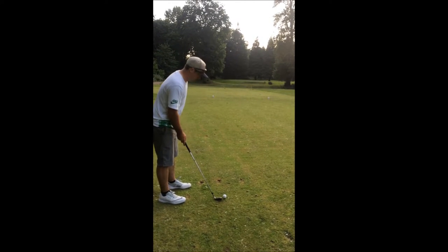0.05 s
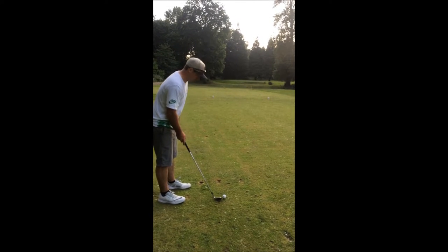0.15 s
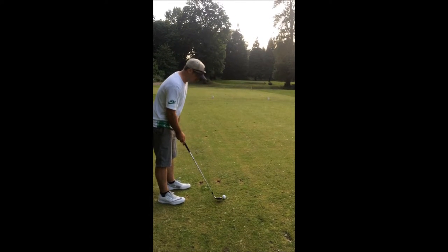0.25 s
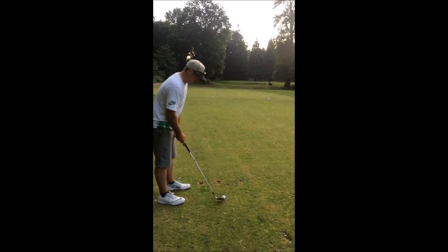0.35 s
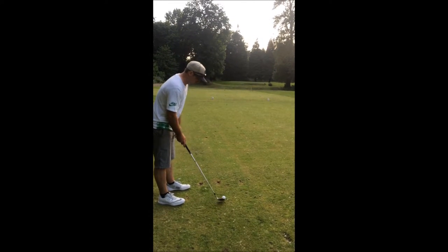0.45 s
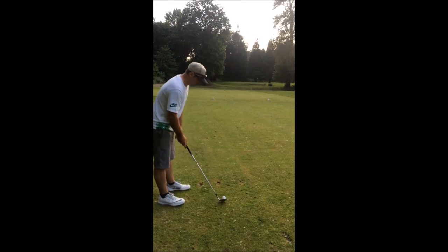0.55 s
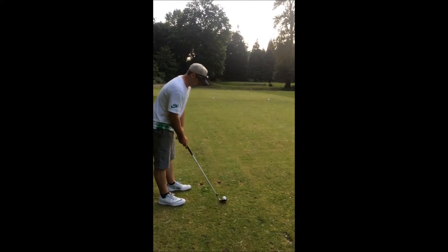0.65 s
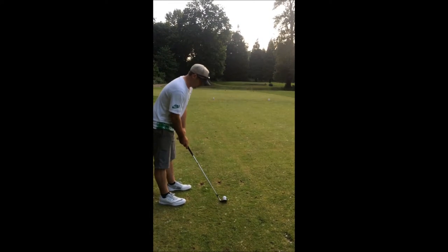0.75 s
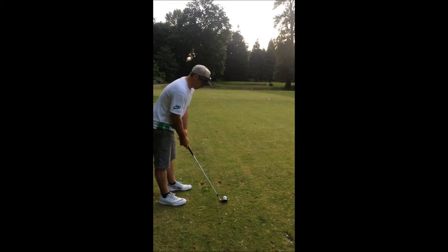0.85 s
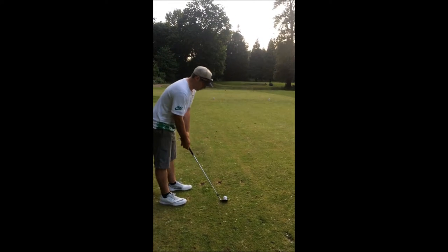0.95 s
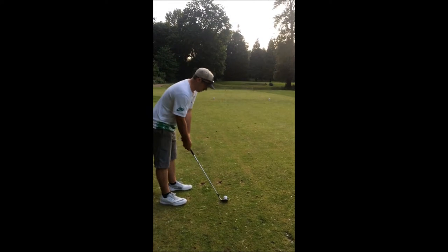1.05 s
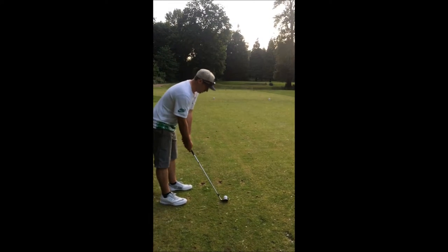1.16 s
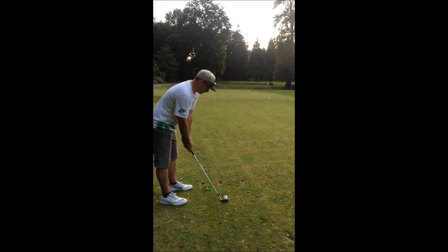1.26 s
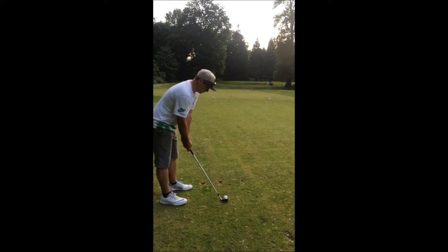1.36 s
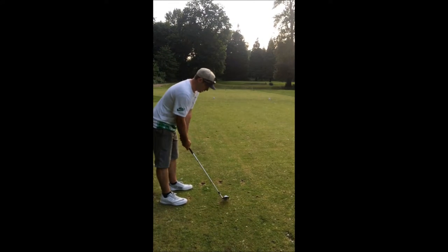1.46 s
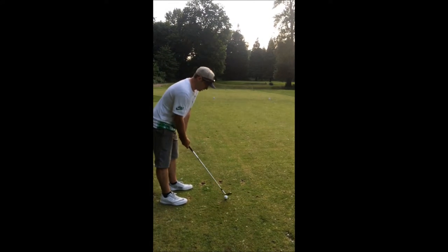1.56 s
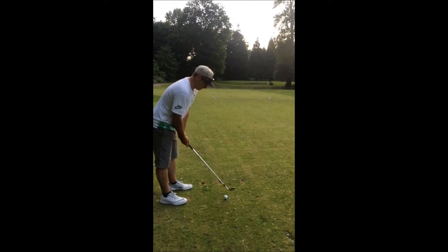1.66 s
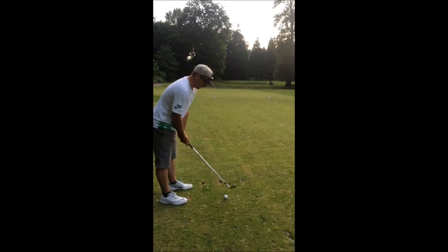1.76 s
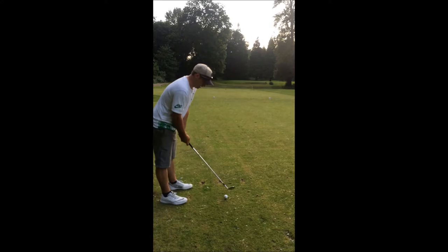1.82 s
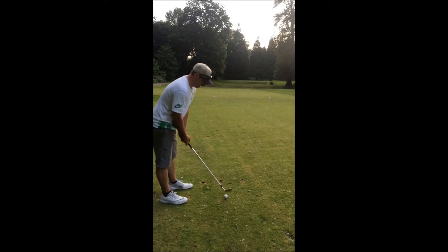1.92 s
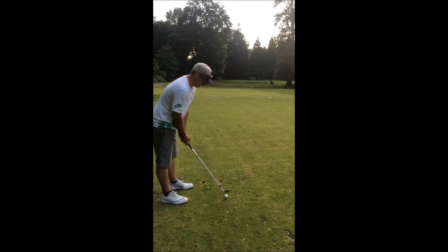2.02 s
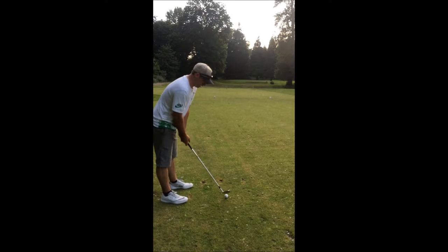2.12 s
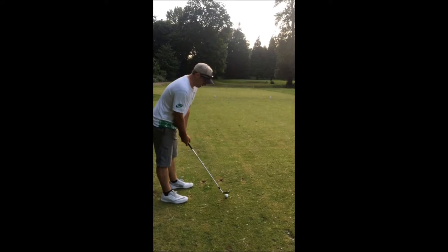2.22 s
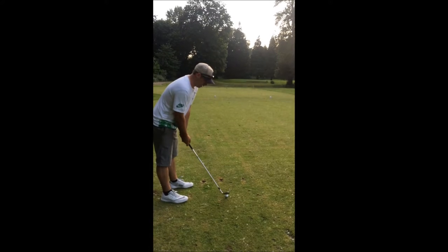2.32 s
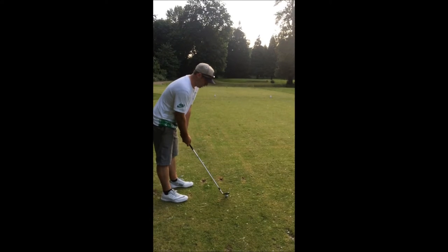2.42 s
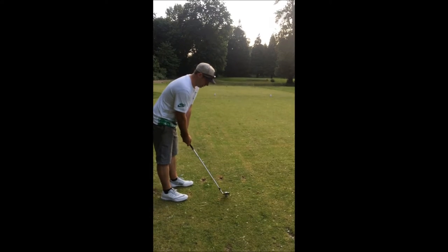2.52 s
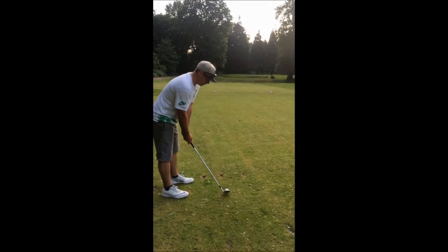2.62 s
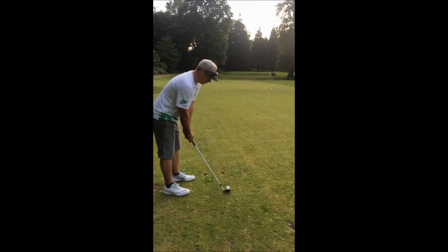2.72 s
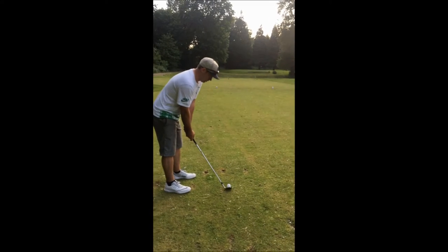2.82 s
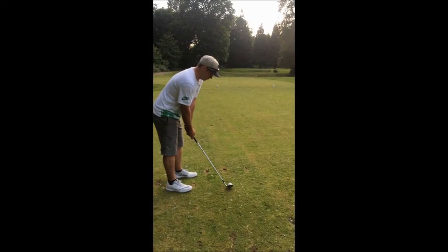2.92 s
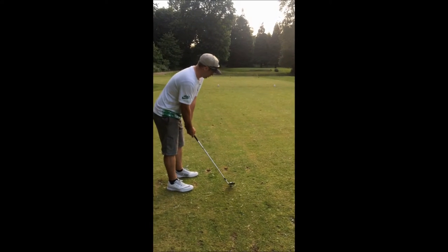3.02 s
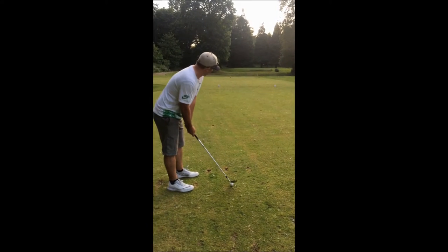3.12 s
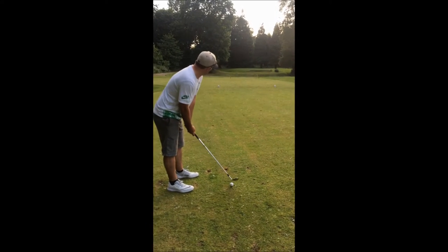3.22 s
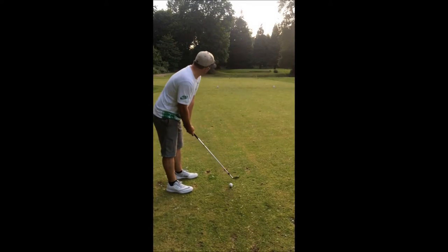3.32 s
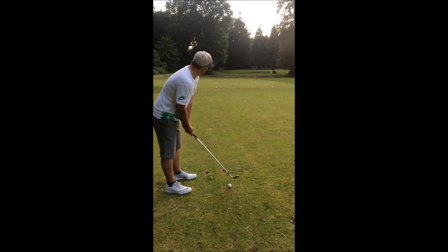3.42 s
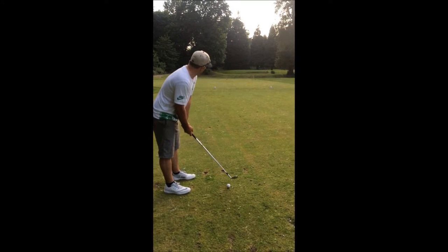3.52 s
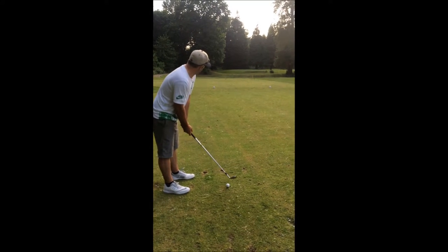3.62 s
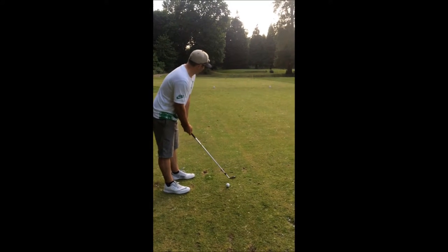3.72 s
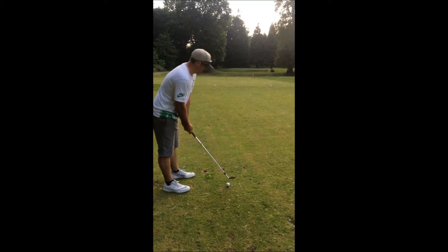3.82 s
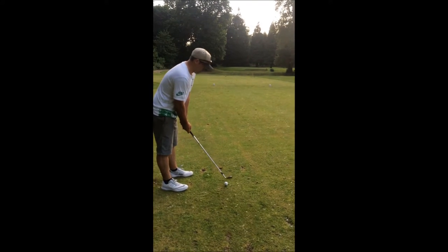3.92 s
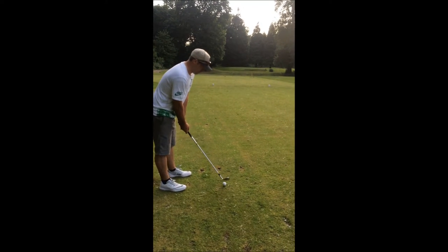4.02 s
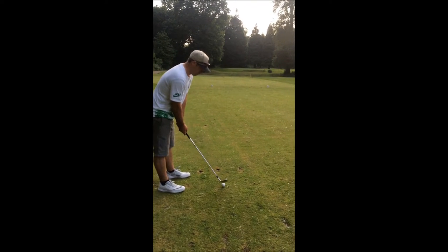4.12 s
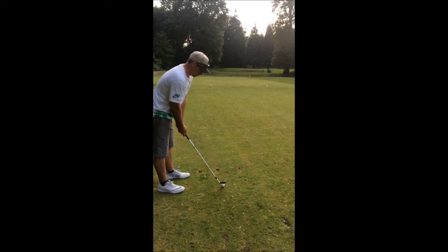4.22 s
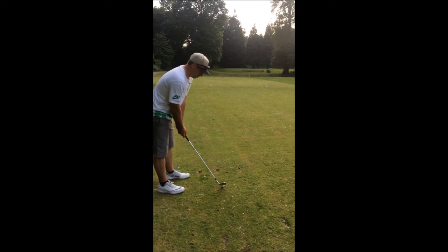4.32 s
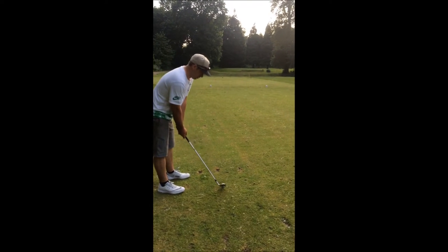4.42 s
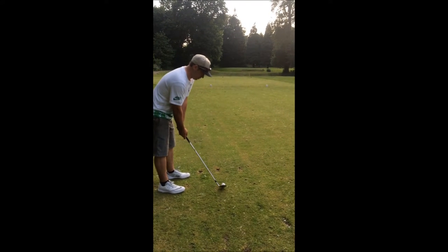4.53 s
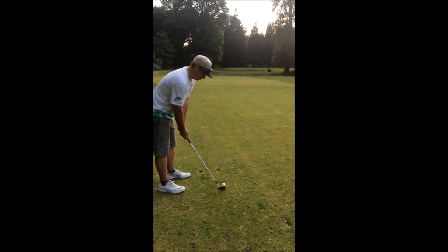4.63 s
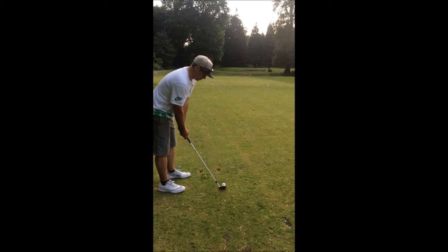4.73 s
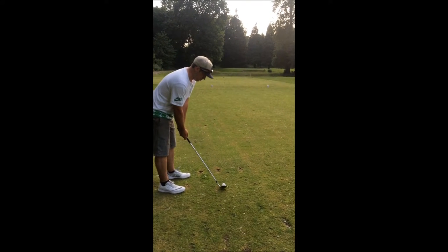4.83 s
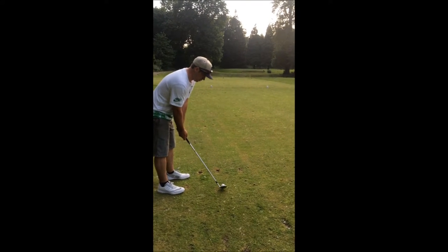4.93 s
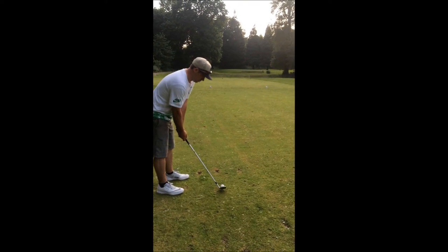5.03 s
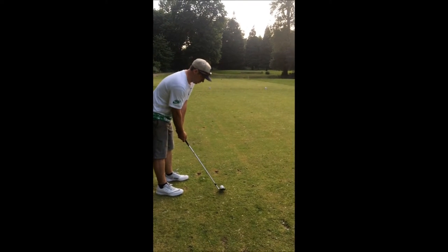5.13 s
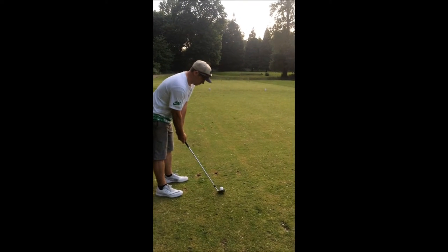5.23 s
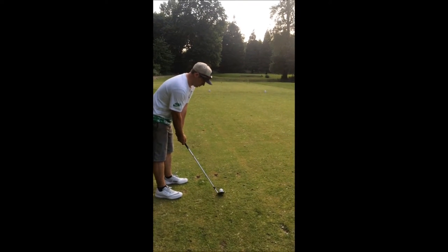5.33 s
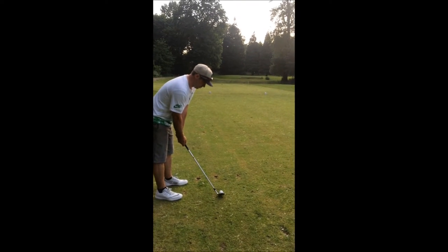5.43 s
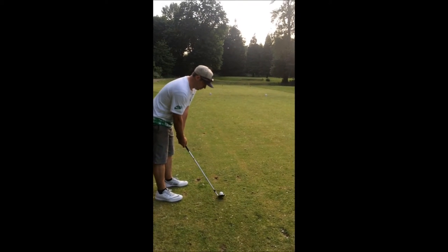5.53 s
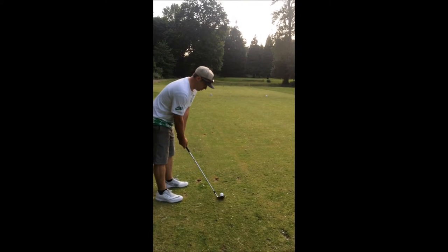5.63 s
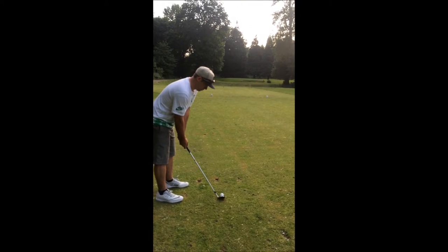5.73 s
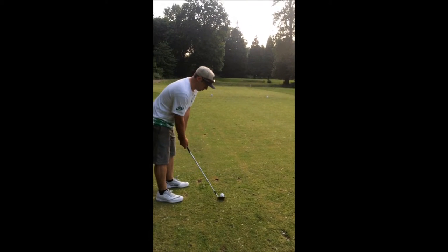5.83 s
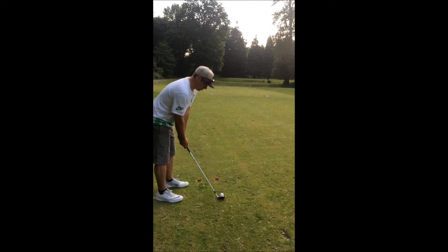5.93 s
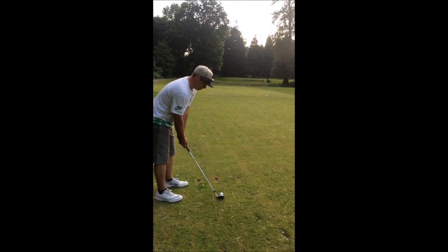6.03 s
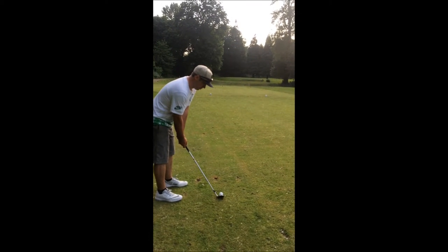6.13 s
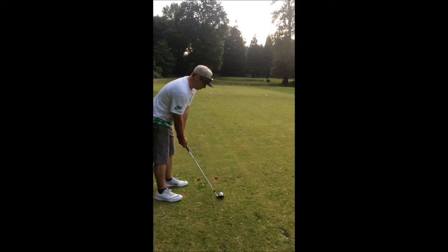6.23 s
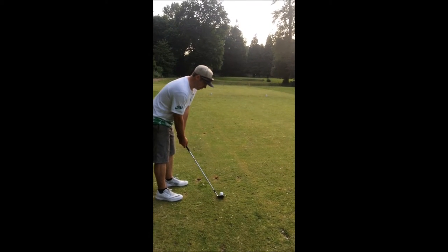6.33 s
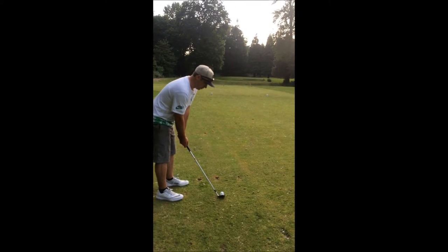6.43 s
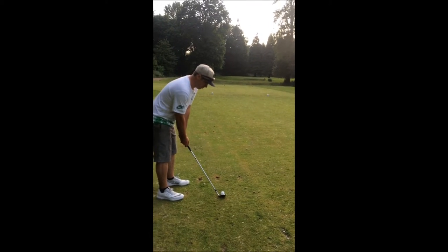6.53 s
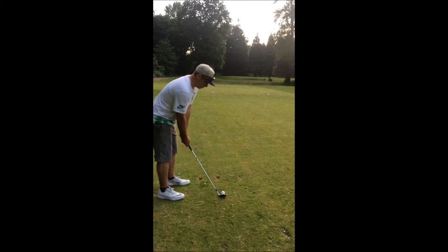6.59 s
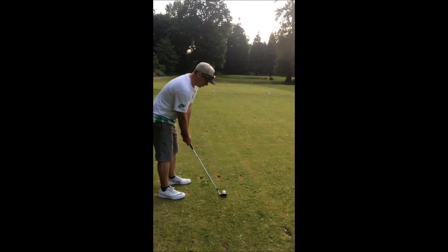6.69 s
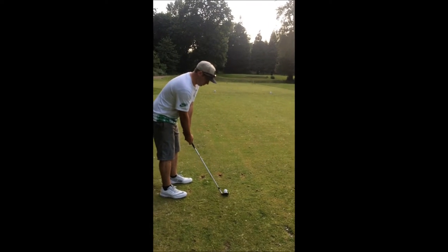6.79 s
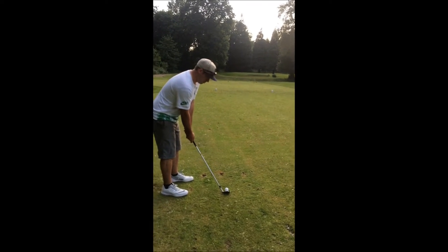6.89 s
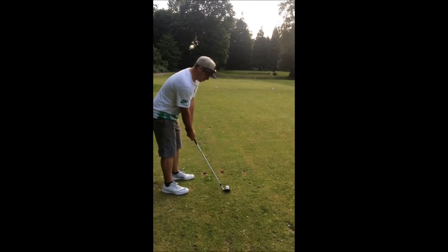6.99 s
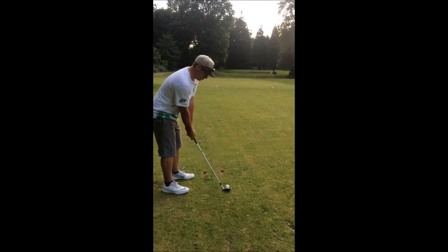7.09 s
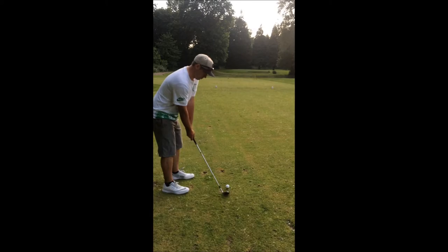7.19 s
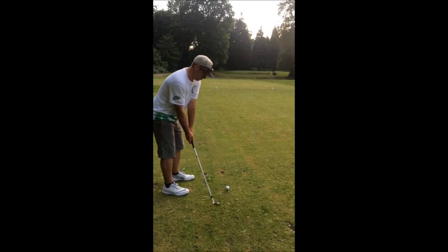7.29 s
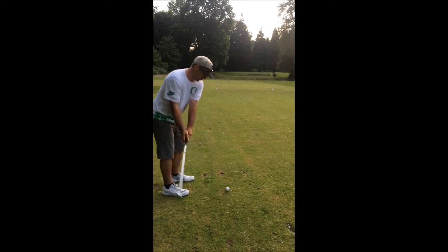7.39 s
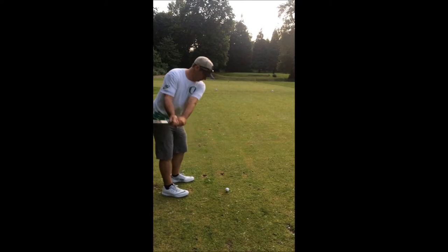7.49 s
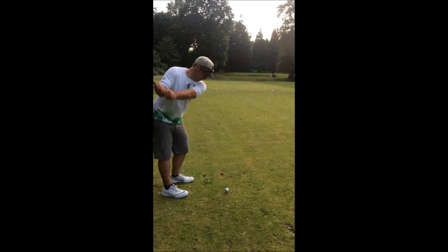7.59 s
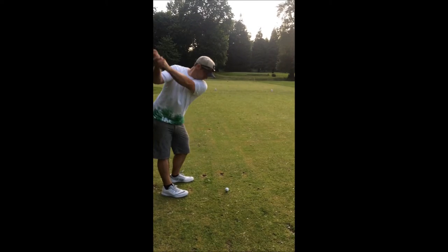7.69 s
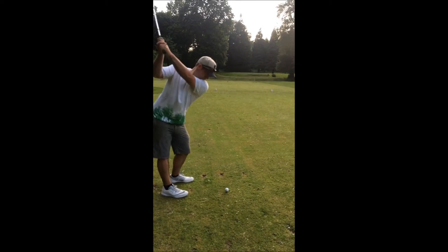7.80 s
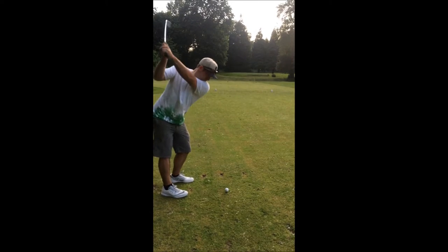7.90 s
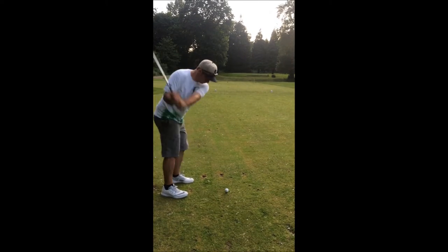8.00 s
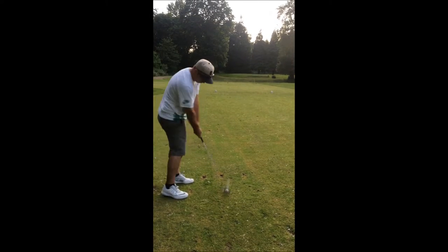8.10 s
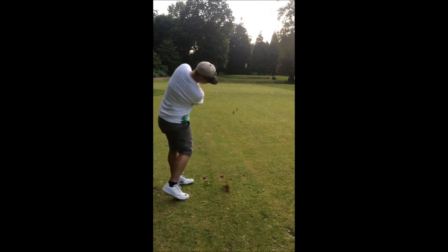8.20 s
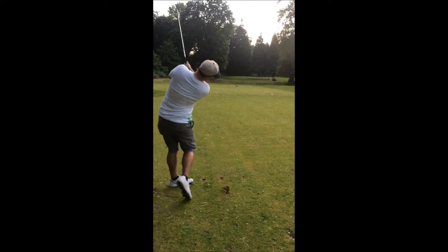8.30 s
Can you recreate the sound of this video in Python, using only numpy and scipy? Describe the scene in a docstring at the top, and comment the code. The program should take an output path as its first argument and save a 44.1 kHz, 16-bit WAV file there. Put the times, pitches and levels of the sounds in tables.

```python
"""Distant traffic rumbles, a far mower hums and small birds call from the echoing wood round a fairway.
Grass and cloth rustle as a golfer addresses the ball. Near the end an iron swings down: the shaft
whistles as it sheds vortices, the face cracks on the ball, ball and head ring, the blade tears the
turf, crumbs of soil scatter and the trees return the crack."""
import sys
import numpy as np
from scipy import signal
from scipy.fft import rfft, irfft, next_fast_len
from scipy.io import wavfile
from scipy.ndimage import uniform_filter1d

SR = 44100
rng = np.random.default_rng(int(sys.argv[2]) if len(sys.argv) > 2 else 0)


def dump(signal):
    """Clip the signal to [-1, 1] and save it as 16-bit WAV at the path in sys.argv[1]."""
    limited = np.clip(np.atleast_2d(signal).T, -1, 1)
    pcm = np.round(limited * 32767).astype(np.int16)
    wavfile.write(sys.argv[1], SR, pcm)


N = 368250
TIME = np.arange(N) / SR
HIT_S, TURF_S = 8.20135, 8.2072  # club meets ball, then ground


def undb(db):
    """Decibels to gain."""
    return 10 ** (np.asarray(db) / 20)


def unit(x):
    """Scale to rms 1."""
    return x / np.sqrt(np.mean(x ** 2))


def response(points, size):
    """Gain of a (frequency [Hz], level [dB]) spectrum on FFT bins."""
    hz, db = np.transpose(points)
    return undb(np.interp(np.log(np.fft.rfftfreq(size, 1 / SR) + 1), np.log(hz), db))


def colour(x, points):
    """Filter by a spectrum, to rms 1."""
    size = next_fast_len(N, True)
    return unit(irfft(rfft(x, size) * response(points, size), size)[:N])


def noise(points):
    """Coloured noise, rms 1."""
    return colour(rng.standard_normal(N), points)


def grains(per_s, spread_db):
    """Random snaps of uneven size."""
    snaps = (rng.random(N) < per_s / SR) * rng.choice([-1, 1], N)
    return snaps * undb(spread_db * np.minimum(rng.exponential(size=N), 4))


def walk(rate_hz):
    """Smooth random drift, rms 1."""
    k = int(SR / rate_hz)
    steps = np.repeat(rng.standard_normal(N // k + 2), k)
    smooth = uniform_filter1d(uniform_filter1d(steps, k), k)
    return unit(smooth[k // 2:k // 2 + N])


def swells(rows):
    """Gain of bell curves (time [s], half-width [s], level [dB]); powers add."""
    return np.sqrt(sum(undb(db) ** 2 * np.exp(-((TIME - s) / width) ** 2) for s, width, db in rows))


def decay(t, t60_s):
    """Gain falling 60 dB in t60_s."""
    return np.exp(-np.log(1000) * t / t60_s)


def fade(start_s, hold_s, t60_s):
    """Gain that opens at once, holds, then decays."""
    return (TIME >= start_s) * decay(np.maximum(TIME - start_s - hold_s, 0), t60_s)


def ring(t, hz, t60_s):
    """One decaying mode."""
    return np.sin(2 * np.pi * hz * t) * decay(t, t60_s)


def add(out, s, sound):
    """Mix a short sound in at time s."""
    i = int(np.clip(s * SR, 0, N - 1))
    out[i:i + len(sound)] += sound[:N - i]


def traffic(rumble_db=-40.5, roar_db=-52.5):
    """Far traffic rumbles and its tyres roar; one car passes."""
    # rumble spectrum before the low-pass (frequency [Hz], level [dB])
    rumble_spectrum = [(20, -26), (30, -21.5), (45, -5), (68, 2), (100, -5), (150, -4), (200, -10),
                       (270, -18), (360, -30), (600, -39)]
    # tyre and air spectrum (frequency [Hz], level [dB])
    roar_spectrum = [(150, -13.5), (400, 1.5), (570, 0.5), (780, 3), (1000, 1.5), (1300, -2.5),
                     (1700, -9.5), (2300, -16.5), (3200, -24.5), (4500, -31), (8000, -34), (15000, -36.5)]
    # passing car (time [s], half-width [s], level [dB])
    far_car = [(.8, 0.7, -58)]
    bass = signal.sosfilt(signal.butter(2, 600, fs=SR, output="sos"), noise(rumble_spectrum))
    rumble = bass * undb(rumble_db + 1.03 * walk(11))
    roar = noise(roar_spectrum) * np.hypot(undb(roar_db), swells(far_car)) * undb(.27 * walk(7))
    return rumble + roar


def tone(hz, db, wander_hz):
    """A far tone wavering in moving air."""
    gain = undb(db + 2 * walk(4))
    pitch_hz = hz + wander_hz * walk(7)
    return gain * np.sin(2 * np.pi * np.cumsum(pitch_hz) / SR)


def mower(blade_hz=162, blade_db=-66):
    """A far engine drones; blade harmonics come and go with the air."""
    # engine tones (frequency [Hz], level [dB], wander [Hz])
    hum = [(74.2, -44.5, 2.54), (136, -45, 0.82), (164.7, -51, 1.53), (333, -70.5, 0.67)]
    # blade tones carried over (time [s], half-width [s], harmonic [number], level [dB])
    blade_swells = [(.05, 0.13, 3, -62), (1.1, 0.63, 6, -62.5), (1.55, .3, 3, -63.5), (4.35, 0.39, 3, -58),
                    (7.22, 0.16, 4, -55.5), (7.65, 0.55, 3, -57.5)]
    engine = sum(tone(hz, db, wander_hz) for hz, db, wander_hz in hum)
    blade = tone(3 * blade_hz, blade_db, wander_hz=1)
    for s, width_s, harmonic, db in blade_swells:
        blade += swells([(s, width_s, db)]) * tone(harmonic * blade_hz, 0, wander_hz=1)
    return engine + blade


def note(length_s, start_hz, middle_hz, end_hz, depth_hz, trill_hz=45):
    """A whistle bent through three pitches with an uneven trill, rms 1."""
    u = np.linspace(0, 1, max(int(length_s * SR), 64))
    t = u * length_s
    arch_hz = np.polyval(np.polyfit([0, .5, 1], [start_hz, middle_hz, end_hz], 2), u)
    jitter = np.interp(t, np.arange(N // 100) / 200, rng.standard_normal(N // 100))
    pitch_hz = arch_hz + depth_hz * (np.sin(2 * np.pi * trill_hz * t) + .5 * jitter)
    return unit(np.sin(2 * np.pi * np.cumsum(pitch_hz) / SR) * signal.windows.tukey(len(u), .3))


def wood(song, t60_s, direct_db, echo_db):
    """Direct sound plus a tail scattered by the trunks."""
    tail = rng.standard_normal(SR) * decay(TIME[:SR], t60_s)
    echo = signal.fftconvolve(song, tail / np.linalg.norm(tail))[:N]
    return undb(direct_db) * song + undb(echo_db) * echo


def far_birds(seep_hz=(6580, 6770, 6760), seep_s=.083, buzz_share=.045, flutter_db=1.5):
    """Whistles, buzzes and thin calls flutter in the air, smeared by the wood."""
    # flat whistles (time [s], length [s], pitch [Hz], source level [dB], trill depth [Hz])
    whistles = [(0, .07, 4225, -70, 19), (.08, .22, 4270, -73.5, 35), (.345, 0.2, 3690, -65.5, 55),
                (.6, 0.085, 3070, -74, 40), (.679, .2, 3650, -65.5, 28), (3.29, 0.15, 2478, -70, 10),
                (5.28, .3, 3530, -78, 36), (5.81, .2, 4180, -78, 17), (6.43, .45, 3830, -83, 70)]
    # buzzy trills (time [s], length [s], pitch [Hz], source level [dB])
    buzzes = [(1.97, .2, 4560, -74), (2.096, 0.16, 5300, -72.5), (2.259, .22, 5650, -78),
              (3.55, .24, 4430, -74), (3.8, 0.45, 3950, -78), (3.87, 1.07, 4740, -76.5),
              (5.07, 0.19, 3400, -68), (5.64, .39, 4630, -78.5)]
    # thin calls that rise and level off (time [s], source level [dB])
    seeps = [(1.05, -79), (2.87, -73), (4.4, -76), (5.56, -75), (7.26, -74)]
    song = np.zeros(N)
    for s, length_s, hz, db, depth_hz in whistles:
        add(song, s, undb(db) * note(length_s, hz, hz, hz, depth_hz))
    for s, length_s, hz, db in buzzes:
        add(song, s, undb(db) * note(length_s, hz, hz, hz, depth_hz=buzz_share * hz))
    for s, db in seeps:
        add(song, s, undb(db) * note(seep_s, *seep_hz, depth_hz=70))
    return wood(song * undb(flutter_db * walk(40)), t60_s=.73, direct_db=-6, echo_db=-4)


def chorus(murmur_db=-83, flicker_db=1.8):
    """The farthest birds merge into a flickering blur."""
    # waves of song (time [s], half-width [s], level [dB])
    waves = [(2.6, 0.66, -75), (4.15, 0.47, -74.5)]
    # song spectrum (frequency [Hz], level [dB])
    spectrum = [(2500, -29), (3500, -2), (4400, 0.5), (5400, -3.5), (6500, -5), (7800, -11.5), (10000, -33)]
    return np.hypot(undb(murmur_db), swells(waves)) * noise(spectrum) * undb(flicker_db * walk(30.05))


def near_birds(whip_cycles=205, pip_hz=3492, pip_s=.045, chirp_hz=(3480, 3840, 3760), upper_ratio=1.178):
    """Crisp whips, pips and two-voiced chirps from the nearest trees."""
    # falling whips (time [s], start pitch [Hz], source level before the taper [dB])
    whips = [(3.1, 4370, -70), (3.218, 4430, -72), (4.255, 4200, -75), (4.97, 7300, -70.5),
             (5.245, 4430, -71), (5.385, 4350, -72), (6.02, 4330, -70), (6.287, 7300, -70),
             (6.93, 3700, -72), (7.032, 4300, -70), (7.178, 4250, -68.5), (8.075, 4400, -71)]
    # one-pitch pips (time [s], source level [dB])
    pips = [(7.06, -75), (7.475, -68.5), (7.758, -68.5), (7.99, -68)]
    # arched chirps (time [s], source level of the lower voice [dB])
    chirps = [(.365, -71.5), (1.075, -69.5), (2.535, -70.5), (4.07, -72), (5.18, -69.5), (5.475, -69),
              (6.759, -71.5)]
    song = np.zeros(N)
    for s, hz, db in whips:
        whip = note(whip_cycles / hz, hz, .82 * hz, .55 * hz, depth_hz=70)
        add(song, s, undb(db) * whip * np.hanning(len(whip)) ** .5)
    for s, db in pips:
        add(song, s, undb(db) * note(pip_s, pip_hz, pip_hz, pip_hz, depth_hz=12))
    for s, db in chirps:  # both sides of the syrinx sing at once
        length_s = .05 + .0036 * rng.standard_normal()
        arch_hz = np.array(chirp_hz) * (1 + .0062 * rng.standard_normal())
        lower = note(length_s, *arch_hz, depth_hz=12)
        upper = undb(-3) * note(length_s, *(upper_ratio * arch_hz), depth_hz=15)
        add(song, s, undb(db) * (lower + upper))
    return wood(song, t60_s=.67, direct_db=-2, echo_db=-4)


def slurring_bird(start_s=1.42, period_s=.156, length_s=.105, first_db=-73.5, growth_db=1.4):
    """Four falling slurs deep in the wood, each louder, more echo than direct sound."""
    song = np.zeros(N)
    for k in range(4):
        slur = note(length_s, start_hz=4800, middle_hz=4560, end_hz=3550, depth_hz=60)
        add(song, start_s + k * period_s, undb(first_db + k * growth_db) * slur)
    return wood(song, t60_s=.8, direct_db=-10, echo_db=-3.5)


def brushes():
    """Grass and cloth give soft, bright rustles."""
    # club and clothes brushing (time [s], half-width [s], level [dB])
    touches = [(1.998, 0.011, -64.5), (7.26, .05, -72.5), (7.65, .12, -77), (7.907, 0.0027, -64),
               (8.04, .09, -72)]
    snaps = grains(per_s=4000, spread_db=3.3)
    return swells(touches) * colour(snaps, [(500, -20), (3000, -2), (8000, -4), (15000, -5)])


def ticking_bird(start_s=3.8, period_s=.122, length_s=.016, hz=6350, source_db=-78, scatter_db=2):
    """Nine faint, falling ticks, even in pace, uneven in level."""
    song = np.zeros(N)
    for k, chance in enumerate(rng.standard_normal(9)):
        tick = note(length_s, 1.05 * hz, hz, .95 * hz, depth_hz=0)
        add(song, start_s + k * period_s, undb(source_db + scatter_db * chance) * tick)
    return wood(song, t60_s=.6, direct_db=-3, echo_db=-5)


def swish(fastest_s=8.183, width_s=.024, shaft_hz=590, whistle_db=-36.5, rush_db=-33.5):
    """The shaft sheds vortices at a pitch in step with its speed; the head drags a rush of air."""
    # air rush spectrum (frequency [Hz], level [dB])
    rush_spectrum = [(200, -6), (600, 1.5), (1200, -1), (2500, -4.5), (4000, -10.5), (7000, -16.5),
                     (11000, -20), (15000, -23)]
    speed = (1 + ((TIME - fastest_s) / width_s) ** 2) ** -.2  # share of top speed
    speed *= np.interp(TIME, [HIT_S, TURF_S], [1, .88])  # ball and turf slow the club
    pitch_hz = shaft_hz * speed * (1 + .012 * walk(300))
    whistle = np.sin(2 * np.pi * np.cumsum(pitch_hz) / SR) * undb(whistle_db + 2 * walk(150))
    rush = undb(rush_db) * noise(rush_spectrum)
    return speed ** 6 * whistle + speed ** 10.4 * rush


def strike(crack_db=4, grit_db=-17, ring_db=-9, thud_db=-19):
    """The face cracks on the ball, ball and head ring, the sole thumps the ground."""
    # impact spectrum (frequency [Hz], level [dB])
    crack_spectrum = [(100, -8), (500, -2), (1100, 1.5), (2800, -1), (4500, -1), (7000, -8), (11000, -16),
                      (15000, -23)]
    # ball and head modes (frequency [Hz], relative level [dB], t60 [s])
    modes = [(810, -14, .028), (1199, -8, .032), (1422, -7, .028), (1660, -4, .026), (1832, -1, .022),
             (1980, -2, .021), (2490, -9, .022), (2800, -8, .018), (3255, -6, .021), (3413, -9, .017),
             (4100, -20, .026), (5010, -22, .025), (5780, -15, .018), (7130, -24, .028), (8420, -25, .024),
             (10870, -21, .027)]
    size = 4096
    t, out = TIME[:size], np.zeros(N)
    # minimum-phase pulse: all frequencies start together
    cepstrum = irfft(np.log(response(crack_spectrum, size)))
    crack = irfft(np.exp(rfft(2 * cepstrum[:size // 2], size)))
    add(out, HIT_S, -undb(crack_db) * crack / np.linalg.norm(crack))
    # grooves scrape the cover
    grit = noise(crack_spectrum)[size:2 * size] * decay(t, t60_s=.013)
    add(out, HIT_S, undb(grit_db) * grit)
    # neighbouring modes swing oppositely, so the ring blooms after the crack
    body = sum((-1) ** k * undb(db) * ring(t, hz, t60_s) for k, (hz, db, t60_s) in enumerate(modes))
    add(out, HIT_S, undb(ring_db) * body)
    add(out, TURF_S, undb(thud_db) * ring(t, hz=160, t60_s=.053))
    return out


def divot(clod_db=-22, clod_s=.0018, sod_db=-29, tear_db=-20.5, crumbs_db=-43):
    """The blade bites a clod loose, the sod knocks, roots and grass snap, crumbs patter away."""
    # tearing turf and soil spectrum (frequency [Hz], level [dB])
    soil_spectrum = [(200, -1), (600, 5.5), (2000, -2), (4000, -7.5), (7000, -7), (12000, -10),
                     (15000, -10)]
    bite = swells([(TURF_S + clod_s, clod_s, clod_db)])
    clod = bite * noise([(80, 7), (300, -4), (700, -9), (2200, 3), (3500, -1), (6000, -31)])
    sod = undb(sod_db) * ring(np.maximum(TIME - TURF_S, 0), hz=285, t60_s=.055)
    tear = undb(tear_db) * fade(HIT_S, hold_s=.005, t60_s=.021)
    crumbs = undb(crumbs_db) * fade(HIT_S, hold_s=0, t60_s=.45)
    soil = colour(grains(per_s=8000, spread_db=3.7), soil_spectrum)
    return clod + sod + (tear + crumbs) * soil


def tree_echo():
    """The crack returns from the trees as a short swell of noise."""
    # echo (time [s], half-width [s], level [dB])
    arrival = [(8.315, 0.031, -53.5)]
    # echo spectrum (frequency [Hz], level [dB])
    spectrum = [(500, -15), (1500, -6), (2800, 2), (3300, -4), (3800, 4), (4600, -9), (8000, -16),
                (15000, -40)]
    return swells(arrival) * noise(spectrum)


def scene():
    """The fairway in mono."""
    background = traffic() + mower() + brushes()
    shot = swish() + strike() + divot() + tree_echo()
    birds = chorus() + far_birds() + near_birds() + slurring_bird() + ticking_bird()
    return (background + shot + birds)[None]


def record(dry):
    """Clip just under full scale, then cut the top treble."""
    top_hz = 15050
    lowpass = signal.ellip(10, .2, 80, top_hz, fs=SR, output="sos")
    return signal.sosfilt(lowpass, np.clip(dry, -.85, .85))


dry = scene()
out = record(dry)
dump(out)
```